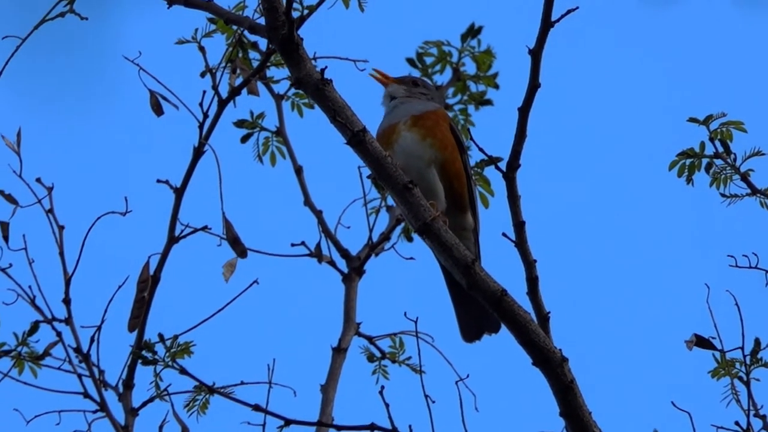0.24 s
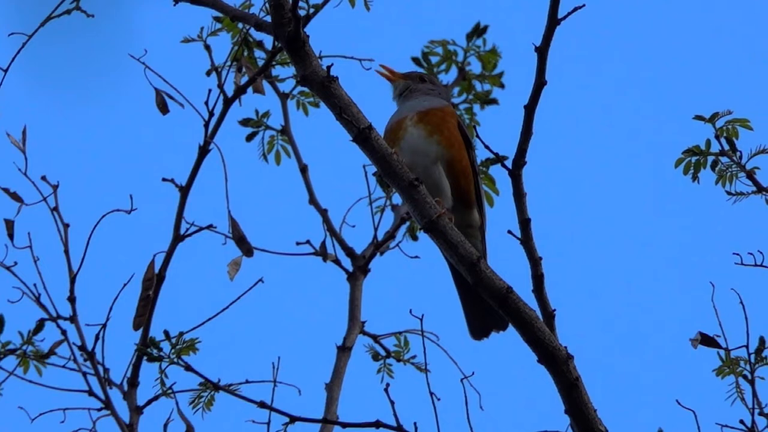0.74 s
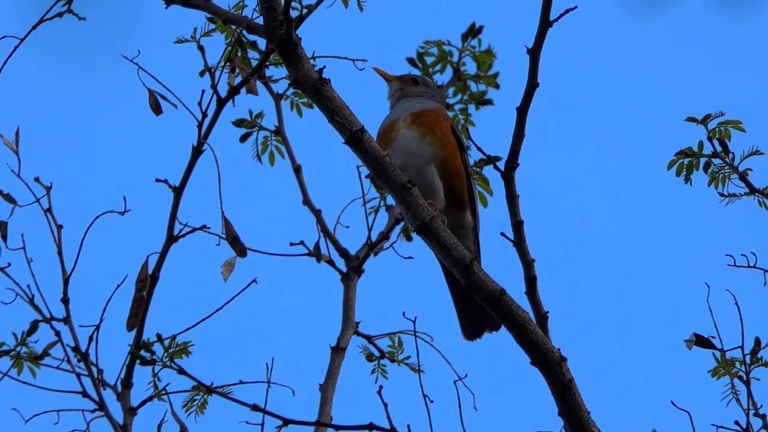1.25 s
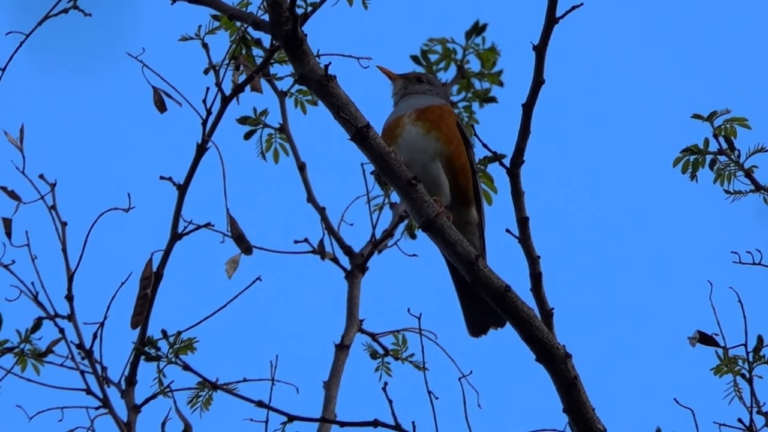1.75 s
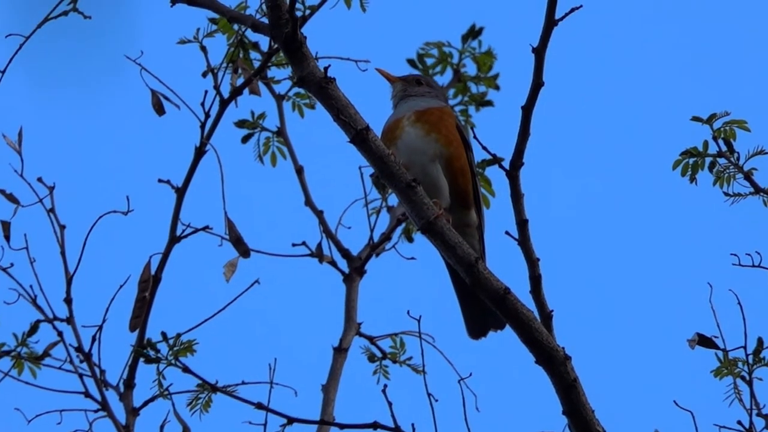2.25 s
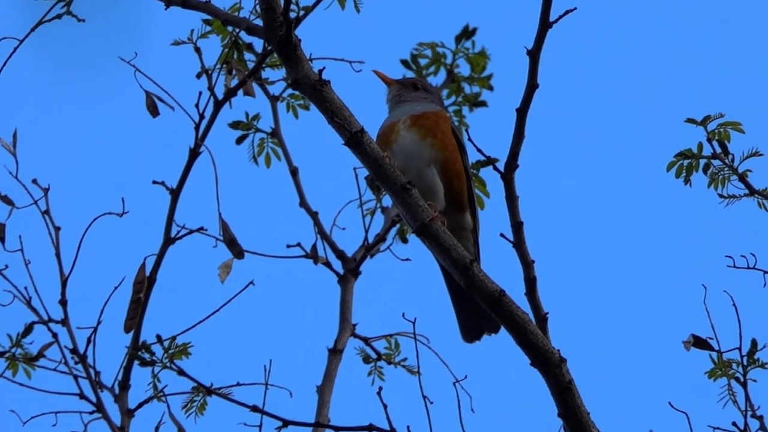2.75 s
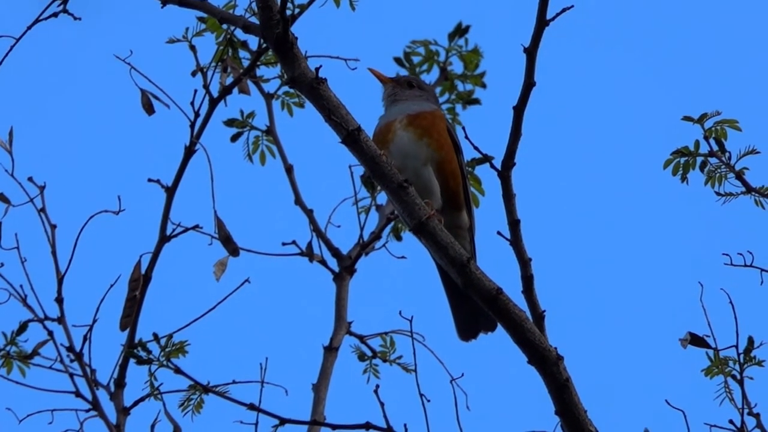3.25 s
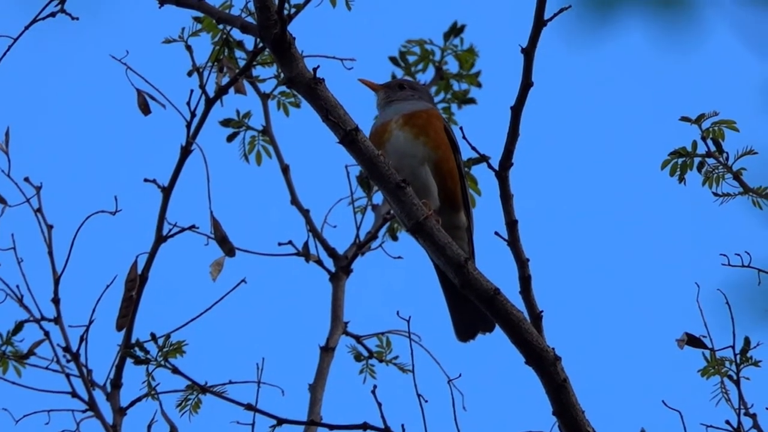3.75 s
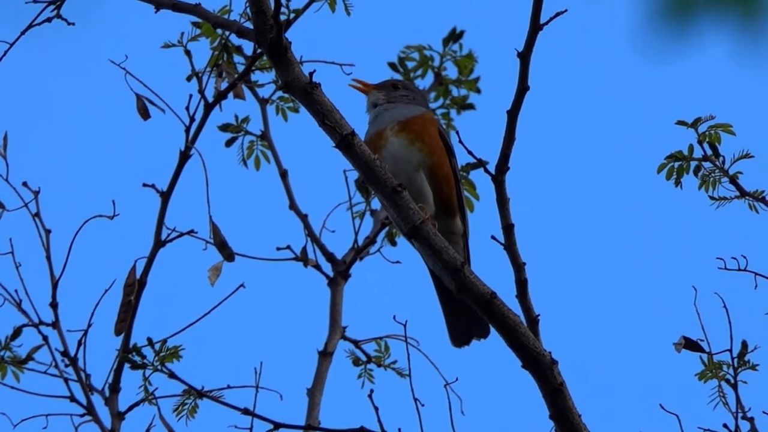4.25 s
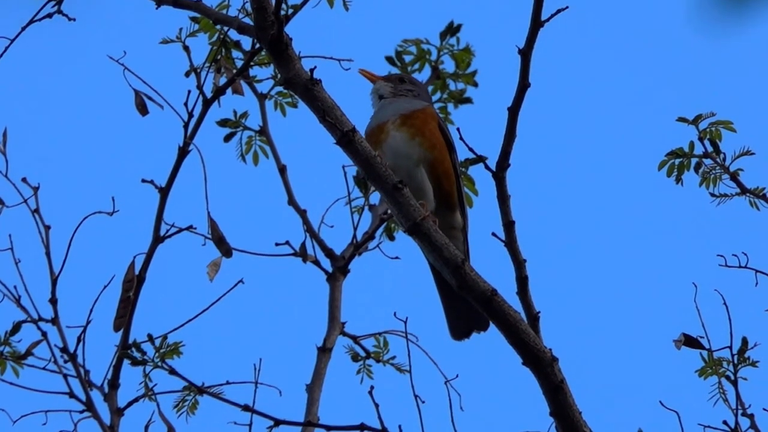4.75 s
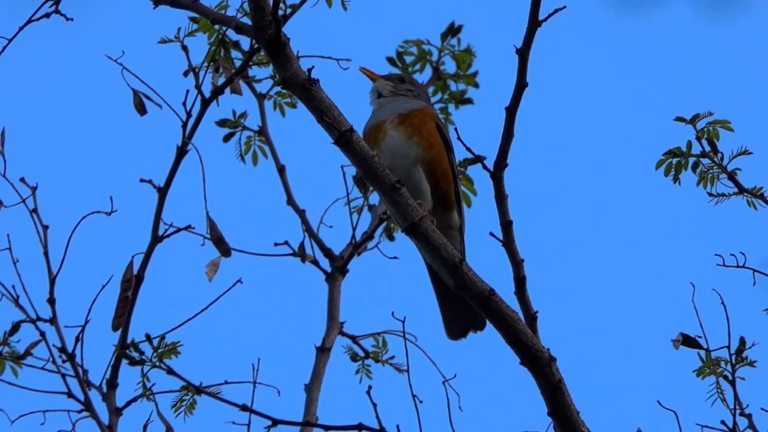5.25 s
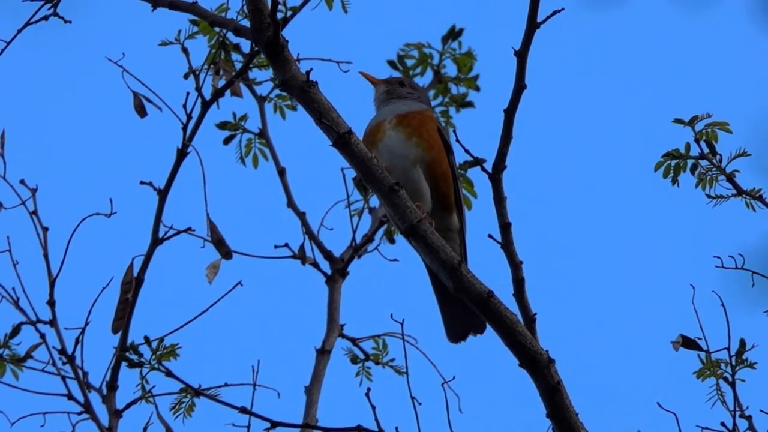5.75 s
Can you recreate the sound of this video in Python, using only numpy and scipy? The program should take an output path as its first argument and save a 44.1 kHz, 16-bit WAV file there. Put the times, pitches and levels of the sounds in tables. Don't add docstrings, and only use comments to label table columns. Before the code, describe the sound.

Clear fluty birdsong in two bursts, at the start and in the last two seconds, stands well above a soft wash of distant traffic. Between them come faint churring, quick high chips, a thin seep and one far crow. The second burst is longer and busier, joined by hoarse caws and sharp small-bird chatter. Leaves hiss in gusts and twigs tick; outdoor stereo pickup, close ground echo and diffuse tree reflections.

```python
import sys
import numpy as np
from scipy import signal
from scipy.io import wavfile
from scipy.ndimage import uniform_filter1d

SR = 44100
rng = np.random.default_rng(int(sys.argv[2]) if len(sys.argv) > 2 else 0)


def generate_wav(signal):
    frames = np.transpose(np.atleast_2d(signal))
    scaled = np.clip(frames, -1, 1) * 32767
    pcm = np.round(scaled).astype(np.int16)
    wavfile.write(sys.argv[1], SR, pcm)


def volts_from_decibels(level):
    exponent = np.asarray(level, float) / 20
    return 10 ** exponent


N = 264159

# (frequency [Hz], level [dB])
OVERTONES = [(3000, -55), (4500, -36.5), (6000, -46.5), (8500, -51.5), (10100, -43.5), (11000, -28.5),
             (13500, -34), (15500, -36)]
# (frequency [Hz], level [dB])
HIGH_OCTAVE = [(7000, -18), (9000, -38), (10800, -27), (12000, -15), (14200, -14), (15500, -27)]


def rms_one(x):
    return x / np.sqrt(np.mean(x ** 2) + 1e-20)


def unit_energy(path):
    return path / np.sqrt(np.sum(path ** 2) / 2)


def butter(x, order, hz, kind="low"):
    return signal.sosfilt(signal.butter(order, hz, kind, fs=SR, output="sos"), x)


def lean(db):
    return volts_from_decibels(db * np.array([[.5], [-.5]]))


def correlated(mid, side, alike):
    return np.sqrt(1 + alike) * mid + np.sqrt(1 - alike) * side * np.array([[1], [-1]])


def at_hz(points, hz):
    return np.interp(np.log(hz), np.log(np.array(points)[:, 0]), np.array(points)[:, 1])


def drift(rate):
    r = np.exp(-80 * np.pi * rate / SR)
    slow = signal.lfilter([1], [1, -2 * r, r * r], rng.standard_normal(N // 40 + 2002))[2000:]
    return np.interp(np.arange(N) / 40, np.arange(len(slow)), rms_one(slow))


def hoarse():
    return rms_one(butter(rng.standard_normal(N), 3, 600))


UNSTEADY = np.tile(drift(30.75), 2)
BREATHY = rms_one(uniform_filter1d(rng.standard_normal(2 * N), size=40))


def add(out, rows, colour=OVERTONES, at=0., db=0., shake=100., turn=0., wobble=0., count=8, first=1,
        patchy_db=4.0, fade=0.0021, round_s=0.0038):
    # (time [s], level [dB])
    beak = [(.1, -2.5), (.45, 3), (.9, -3.5), (4.0, -3.5), (4.2, -2.5), (4.4, -2), (4.8, 1), (5.13, 8.5),
            (5.21, 7), (5.33, 0), (5.65, 4)]
    s, hz, level, *swing = np.transpose(rows)
    t = np.arange(max(s[0] + at, 0) * SR, min((s[-1] + at) * SR, N - 1)) / SR
    hz = np.interp(t - at, s, hz)
    hz = uniform_filter1d(hz, max(int(round_s * SR), 1), mode="nearest")
    if swing:
        cycle = 2 * np.pi * shake * t + turn + wobble * UNSTEADY[:len(t)]
        hz = hz + np.interp(t, s, swing[0]) * np.sin(cycle)
    level = np.interp(t - at, s, level)
    edge = np.clip(np.minimum(t - t[0], t[-1] - t) / fade, 0, 1)
    phase = 2 * np.pi * np.cumsum(hz) / SR
    tone = np.sin(phase) * first
    i = int(t[0] * SR)
    pure = 0.24 * np.maximum(level + 14.0, 0) + hz / 300 * (colour is OVERTONES)
    pure = pure - 6 - np.interp(t, *np.transpose(beak))
    for k in range(2, count + 1):
        unsteady = UNSTEADY[i + 900 * k:][:len(t)]
        gain = volts_from_decibels(at_hz(colour, k * hz) - first * pure + patchy_db * unsteady) * (k * hz < 17000)
        rasp = 1 + first * 0.25 * BREATHY[i + 900 * k:][:len(t)]
        tone += gain * np.sin(k * phase) * rasp
    out[i:i + len(t)] += np.sqrt(2) * volts_from_decibels(level + db) * edge * tone


def thrush():
    return whistles() + low_buzz() + high_buzz() + twitter()


def shaped(shape, note, flick_hz=0):
    s, length, top, end, db = note
    rows = []
    for k, (share, fall, below) in enumerate(shape):
        hz = top - fall * (top - end) + flick_hz * (k == 0)
        rows.append((s + share * length, hz, db + below))
    return rows


def whistles():
    # (share of length [1], share of pitch fall [1], level [dB])
    warble_shape, arch_shape = [(0, .15, -7.5), (.25, 0, -9.5), (.4, 0.12, -1.5), (.65, .35, -2),
                                (1, 1, -16)], [(0, 0.664, -20), (.55, 0.067, -4), (1, 0.89, -7)]
    fall_shape, sag_shape = [(0, -0.31, -12), (.32, 0, -2), (1, 0.53, -3.5)], [(0, 0.096, 0.5), (.25, 0.35, 4), (.6, .55, -3.5), (1, 0.55, -15)]
    # (time [s], length [s], top pitch [Hz], end pitch [Hz], level [dB])
    warbles, arches = [(.008, 0.042, 2117, 1746, -30), (0.051, 0.026, 2121, 1595, -22),
                       (0.083, 0.033, 2040, 1585, -22.5), (0.118, .034, 1953, 1562, -23.5),
                       (0.159, 0.031, 1884, 1590, -21.5)], [(4.145, 0.036, 2274, 1706, -24)]
    falls, sags = [(4.856, 0.044, 2039, 1746, -21.5), (4.906, 0.037, 1860, 1697, -29.5)], [(5.303, 0.07, 1914, 1747, -29)]
    # (time after onset [s], pitch [Hz], level [dB])
    dips = [
        [(0, 2850, -37), (.008, 2780, -28.5), (.022, 2590, -22.5), (.048, 2087, -22), (.063, 1850, -34),
         (.076, 1990, -24), (.096, 2368, -16.5), (.108, 2466, -28.5), (.122, 2490, -35)],
        [(0, 2844, -43), (.009, 2774, -25.5), (.023, 2551, -19), (.047, 2040, -20.5), (.062, 1850, -32.5),
         (.077, 1993, -22), (.097, 2403, -18), (.109, 2458, -21.5), (.123, 2487, -31)],
    ]
    dip_at = [0.315, 0.506]
    # (time after onset [s], pitch [Hz], level [dB])
    dip_hum = [(.118, 2445, -35), (.15, 2450, -36), (.168, 2450, -42)]
    # (time [s], pitch [Hz], level [dB])
    slide = [(4.318, 2850, -47), (4.33, 2840, -27.5), (4.345, 2778, -26.5), (4.357, 2660, -13),
             (4.379, 2526, -20), (4.387, 2550, -14), (4.393, 2273, -26), (4.4, 2026, -26.5),
             (4.409, 2150, -20)]
    # (time [s], pitch [Hz], level [dB])
    lead_ins = [
        [(3.866, 2770, -55), (3.885, 2868, -32.5), (3.904, 2690, -33)],
        [(5.59, 3160, -53), (5.61, 2940, -40)],
    ]
    # (time [s], pitch [Hz], level [dB])
    phrased = [
        [(.196, 1900, -33), (.203, 1990, -29), (.214, 1883, -27), (.235, 1780, -29), (.247, 1700, -37.5),
         (.258, 1750, -48)],
        [(4.409, 2340, -35), (4.428, 2220, -24.5), (4.445, 2113, -26), (4.456, 2016, -29.5),
         (4.474, 1780, -36.5)],
        [(4.672, 2160, -36), (4.688, 2146, -26.5), (4.698, 2214, -21.5), (4.707, 2240, -27),
         (4.714, 2090, -22.5), (4.727, 2038, -19), (4.735, 1970, -47)],
        [(4.737, 2663, -31.5), (4.746, 2227, -27.5), (4.755, 2228, -16), (4.768, 2308, -23), (4.776, 2210, -22),
         (4.782, 2168, -14.5), (4.791, 2044, -21.5), (4.799, 1830, -24)],
        [(4.804, 2224, -39), (4.811, 2220, -29), (4.821, 2134, -18), (4.835, 1910, -26), (4.849, 1800, -22.5)],
        [(5.107, 2102, -35.5), (5.125, 2113, -25.5), (5.145, 2120, -23), (5.161, 2140, -23.5),
         (5.168, 1980, -36), (5.175, 2070, -32)],
        [(5.175, 2090, -29), (5.19, 2180, -21.5), (5.203, 2209, -24.5), (5.219, 2198, -21.5),
         (5.226, 2173, -16.5), (5.234, 1998, -28), (5.24, 1980, -31.5)],
        [(5.174, 3100, -34), (5.178, 2580, -32), (5.182, 2200, -16)],
        [(4.189, 1790, -28), (4.195, 2010, -40), (4.199, 2675, -32), (4.204, 1975, -26.5), (4.212, 1840, -35),
         (4.225, 1675, -36), (4.233, 1715, -46)],
        [(5.245, 2745, -33), (5.249, 2390, -26.5), (5.256, 2057, -25.5), (5.27, 2026, -20.5),
         (5.283, 1923, -23), (5.291, 2090, -24)],
    ]
    out = np.zeros(N)
    for shape, notes in [(warble_shape, warbles), (arch_shape, arches), (fall_shape, falls)]:
        for note in notes:
            add(out, shaped(shape, note))
    for note in sags:
        add(out, shaped(sag_shape, note, flick_hz=561))
    for s, rows in zip(dip_at, dips):
        add(out, rows, at=s, round_s=0.0036)
        add(out, dip_hum, at=s, count=1)
    for rows in [slide] + lead_ins + phrased:
        add(out, rows, round_s=0.0022, fade=0.0017)
    return out


def low_buzz():
    # (time [s], pitch [Hz], level [dB], swing [Hz])
    low_notes = [(3.904, 2692, -25.5, 230), (3.942, 2715, -24.5, 414), (3.975, 2619, -21.5, 384),
                 (4.03, 2575, -20.5, 363), (4.061, 2590, -25.5, 347)]
    # (frequency [Hz], width [Hz])
    hz, width = (2740, 450)
    buzz = np.zeros(N)
    raised = [(f, db + 3.0) for f, db in OVERTONES]
    add(buzz, low_notes, colour=raised, shake=62.5, turn=1.63, wobble=0.72, db=1.5)
    return 0.39 * buzz + 0.44 * signal.lfilter(*signal.iirpeak(hz, hz / width, fs=SR), buzz)


def high_buzz():
    # (time [s], pitch [Hz], level [dB], swing [Hz])
    high_notes = [(.803, 3540, -51, 5), (0.815, 4350, -40, 3), (0.822, 6850, -41.5, 410),
                  (0.872, 6770, -35.5, 290), (0.913, 6710, -36, 330), (.92, 6200, -32.5, 10),
                  (0.927, 4840, -33.5, 5), (0.934, 4240, -33.5, 11), (0.944, 3200, -42, 8)]
    second_voice = [(.832, 3225, -51, 80), (.86, 3250, -46, 60), (.89, 3250, -55, 60),
                    (.912, 3270, -48, 60), (.928, 3050, -50, 40)]
    sum_tone = [(.83, 10010, -57, 250), (.87, 9900, -54, 260), (.918, 10100, -54, 200)]
    shake = 141.
    out = np.zeros(N)
    add(out, high_notes, colour=HIGH_OCTAVE, shake=shake, turn=.3, wobble=0.99, round_s=0.0025, count=2)
    add(out, second_voice, shake=shake, wobble=0.87)
    add(out, sum_tone, shake=shake, count=1)
    return out


def twitter():
    # (time [s], level [dB])
    hooks_at = [(5.603, -5), (5.638, -2.8), (5.671, -7), (5.706, -10.5)]
    # (time after onset [s], pitch [Hz], level [dB])
    hook_up, hook_down = [(.005, 4860, -44), (.0095, 5270, -36), (.012, 6800, -36), (.015, 7250, -34),
                          (.023, 7250, -35), (.027, 7150, -46)], [(.013, 5460, -44), (.016, 5020, -51), (0.02, 3637, -46),
                                           (.029, 2800, -37.5), (.04, 2340, -43)]
    # (time [s], pitch [Hz], level [dB])
    pickup = [(5.599, 5070, -52), (5.603, 5070, -36), (5.606, 4900, -35), (5.61, 3500, -39)]
    # (time [s], centre [Hz], level [dB], swing [Hz])
    breath = [(5.599, 4810, -60, 900), (5.617, 5300, -45, 1710), (5.69, 5390, -50, 1820),
              (5.755, 6030, -49, 1500)]
    clean, rough = np.zeros((2, N))
    add(clean, pickup, colour=HIGH_OCTAVE, round_s=0.0026, fade=0.0031, count=3)
    for s, db in hooks_at:
        add(clean, hook_up, colour=HIGH_OCTAVE, at=s, db=db, round_s=0.0017, count=2, fade=0.0022)
        add(rough, hook_down, at=s, db=db)
    add(rough, breath, colour=HIGH_OCTAVE, shake=230.0, wobble=6.8, count=2)
    return clean + rough * (1 + 0.51 * hoarse())


def crows():
    # (time [s], length [s], top pitch [Hz], loudest at share of length [1], level [dB])
    caws = [
        (3.08, 0.18, 479.5, 0.48, -51.5),
        (4.675, 0.21, 434.3, 0.7, -39.5),
        (5.243, .215, 433.8, 0.7, -39.5),
        (5.83, 0.2, 428, 0.69, -43.5),
    ]
    caw_arch = [
        (.49, .56, 1.15),
        (.46, .63, 1.6),
    ]
    # (frequency [Hz], level [dB])
    first_throat, second_throat = [(400, -29), (950, -7), (1100, -20), (1250, 12), (1450, 7), (1700, 10),
                                   (1830, 0), (1900, -8), (1990, 12.5), (2150, -43), (4600, -11),
                                   (6000, -20)], [(400, -36), (900, -25), (1150, -14), (1280, -1),
                                                        (1400, -1.5), (1550, 3), (1720, -9.5), (1900, -28),
                                                        (3200, -22), (4000, -59)]
    out, share = np.zeros(N), np.linspace(0, 1, num=21)
    for k, (s, length, top, loudest, db) in enumerate(caws):
        crest, droop, roundness = caw_arch[k > 0]
        hz = top * (1 - droop * np.abs(share - crest) ** roundness)
        swell = db - 27 * (share - loudest) ** 2
        caw = np.transpose([s + share * length, hz, swell])
        add(out, caw, colour=[first_throat, second_throat][k > 0], count=12, first=0, patchy_db=1.0,
            fade=0.0012, round_s=0.039)
    return out * volts_from_decibels(0.5 * drift(5.6))


def small_birds():
    # (time [s], pitch [Hz], level [dB], swing [Hz])
    chatter = [
        [(1.483, 8240, -51, 450), (1.51, 8170, -44.5, 497), (1.562, 8170, -49.5, 500)],
        [(5.63, 8000, -55.5, 795), (5.7, 8140, -41, 910), (5.76, 8180, -53, 786)],
    ]
    # (time after onset [s], pitch [Hz], level [dB])
    chip = [(0, 8200, -6), (.003, 6600, -.1), (.006, 5200, -2), (.009, 4000, -10)]
    # (time [s], level [dB])
    chip_at = [(1.49, -53.5), (1.515, -50), (1.538, -48), (1.549, -53), (1.581, -46.5), (1.617, -48.5),
               (1.662, -47), (1.703, -48.5), (5.625, -39), (5.642, -36.5), (5.662, -48), (5.683, -35.5),
               (5.703, -57), (5.722, -74), (5.745, -46), (5.777, -44), (5.812, -47), (5.85, -47)]
    # (lag [s], level [dB])
    flurry = [(0, -2), (.0025, -3), (.0055, -5), (.008, -7), (.012, -12)]
    # (time [s], pitch [Hz], level [dB])
    chatter_arcs = [
        [(5.688, 8240, -44), (5.694, 9400, -39), (5.699, 8200, -42), (5.706, 7600, -41)],
        [(5.715, 8500, -50), (5.721, 9350, -45), (5.727, 7600, -42)],
        [(5.129, 8500, -56), (5.135, 8850, -44), (5.14, 8700, -58)],
        [(5.589, 6220, -60), (5.595, 5900, -58), (5.602, 6100, -55)],
    ]
    # (time after onset [s], pitch [Hz], level [dB])
    seep = [(0, 6720, -54), (.008, 7640, -36.5), (0.022, 7300, -42), (.028, 6610, -42), (.045, 6950, -45),
            (.06, 6610, -43)]
    # (time [s], level [dB])
    seep_at = [
        (3.047, -1),
        (4.597, -6.5),
    ]
    # (time [s], pitch [Hz], level [dB])
    thin_arcs = [
        [(1.005, 11300, -68), (1.035, 12300, -62), (1.07, 12500, -60), (1.105, 11500, -67)],
        [(1.145, 12500, -64), (1.172, 11600, -67)],
    ]
    out = np.zeros(N)
    for rows in chatter:
        add(out, rows, shake=80.0, turn=1.3, wobble=.9, count=1)
    for s, db in chip_at:
        for lag, lag_db in flurry:
            add(out, chip, at=s + lag, db=db + lag_db, count=1, fade=0.0012, round_s=.001)
    out = out * (.75 + .75 * hoarse())
    for rows in chatter_arcs:
        add(out, rows, count=1, round_s=0.0034, fade=0.0013)
    for s, db in seep_at:
        add(out, seep, at=s, db=db, count=1, round_s=0.0051)
    for rows in thin_arcs:
        add(out, rows, count=1, round_s=0.027)
    return out


def far_birds():
    # (time [s], level [dB])
    churr_at = [(.32, -57), (0.399, -49), (.49, -50), (.595, -49.5), (0.691, -48), (0.781, -51),
                (.96, -47.5), (1.04, -52), (2.12, -52.5), (2.2, -48.5), (2.295, -51.5), (2.395, -49.5),
                (2.5, -46.5), (2.611, -50.5)]
    # (start pitch [Hz], end pitch [Hz], level [dB], swing [Hz])
    churr = [
        (4630, 4350, 1.5, 265),
        (3715, 3520, -1, 130),
    ]
    # (time [s], pitch [Hz], level [dB])
    faint_whistles = [
        [(1.045, 3240, -54), (1.09, 3110, -57.5), (1.135, 2950, -59)],
        [(1.16, 2620, -53.5), (1.21, 2520, -60), (1.245, 2450, -70)],
        [(2.645, 4650, -64), (2.68, 4600, -66), (2.73, 4600, -66)],
    ]
    out = np.zeros(N)
    for s, db in churr_at:
        for start, end, voice_db, swing in churr:
            rows = [(s - .01, start, db - 5.0, swing),
                    (s + 0.0229, (start + end) / 2, db - 5.5, swing),
                    (s + 0.068, end, db - 17.0, swing)]
            add(out, rows, db=voice_db, shake=62.0, turn=40 * s, wobble=2.7, count=1, fade=0.023)
    for rows in faint_whistles:
        add(out, rows, count=1, fade=0.006)
    return out * (1 + .4 * hoarse())


def far_motor():
    # (time [s], pitch [Hz], level [dB], swing [Hz])
    motor = [(0, 528.6, -58, 30), (.12, 522, -68, 30), (.3, 521, -64, 30), (.6, 541, -74.5, 30)]
    out = np.zeros(N)
    add(out, motor, shake=10.0, wobble=3.03, count=1, fade=0.012)
    return out


def far_sounds():
    return (far_birds() + far_motor()) * volts_from_decibels(2.5 * drift(40))


def outdoors(x, ground, wet_db, t60, alike):
    # (lag [s], level [dB], lean to left, and opposite to right [dB])
    late_echoes = [(.0057, -18, 2), (.0127, -22, 3), (.052, -21, 2), (.075, -20, -2)]
    # (lag [s], spread [s], level [dB])
    wood_s, wood_spread, wood_db = (0.27, 0.4, -23)
    t = np.arange(int(1.6 * SR)) / SR
    mid, side = rng.standard_normal((2, len(t))) * volts_from_decibels(-60 * t / t60) * np.clip(t / .015, 0, 1)
    path = volts_from_decibels(wet_db) * unit_energy(butter(correlated(mid, side, alike), 1, 7000))
    walls = np.zeros_like(path)
    for s, db, lean_db in late_echoes:
        walls[:, round(s * SR)] += volts_from_decibels(db + lean_db * np.array([1, -1]))
    path += butter(walls, 2, 4200)
    wood = rng.standard_normal(path.shape) * np.exp(-((t - wood_s) / wood_spread) ** 2)
    path += volts_from_decibels(wood_db) * unit_energy(wood)
    path = signal.lfilter([.55], [1, -.45], path)
    twigs = rng.standard_normal(path.shape) * volts_from_decibels(-60 * t / 0.21)
    path += butter(volts_from_decibels(-0.5) * unit_energy(twigs), 2, 7900, "high")
    path[:, 0] += 1
    bounce = np.zeros_like(path)
    echo_s, right_lag_s = .00744, .000025
    bounce[0, round(echo_s * SR)] = ground * volts_from_decibels(2.5)
    bounce[1, round((echo_s + right_lag_s) * SR)] = ground * volts_from_decibels(-2.5)
    path += butter(bounce, 1, 5000)
    return signal.fftconvolve(x[None], path, axes=1)[:, :N]


def background():
    return traffic() + leaves() + twig_ticks() + drone()


def banded_noise(spectrum, source, patchy_db):
    # (frequency [Hz], correlation [1])
    likeness = [(30, .88), (150, .92), (330, .92), (700, 0.6), (2000, 0.54), (6000, 0.49), (15000, 0.3)]
    # (frequency [Hz], level [dB])
    band_lean = [(60, -.5), (330, -1.5), (600, 3.3), (1200, 1.5), (2500, .6), (8000, 1.8), (15000, .8)]
    out, edges = 0, 20 * 2 ** np.arange(0, 9.8, .4)
    for k, (low, high) in enumerate(zip(edges, edges[1:])):
        hz = np.sqrt(low * high)
        if hz < spectrum[0][0]:
            continue
        mid, side = butter(source[k % 2], 2, [low, high], "band")
        alike = np.clip(at_hz(likeness, hz), -1, 1)
        gain = volts_from_decibels(at_hz(spectrum, hz) + patchy_db * drift(1.86))
        out = out + gain * lean(at_hz(band_lean, hz)) * correlated(mid, side, alike)
    return rms_one(out)


def gusts():
    # (time of height [s], level [dB], rise [dB/s], fall [dB/s])
    gust_rows = [
        (.35, -75, 70, 13),
        (1.0, -71, 34, 38),
        (2.029, -57.5, 66, 62),
        (2.78, -57.5, 19.5, 19.5),
        (5.03, -53, 41.5, 46),
        (5.738, -66, 58, 38),
    ]
    t = np.arange(N) / SR
    slopes = [db - np.maximum(rise * (s - t), fall * (t - s)) for s, db, rise, fall in gust_rows]
    return volts_from_decibels(-83.5) + volts_from_decibels(np.max(slopes, axis=0))


def leaves():
    # (frequency [Hz], density [dB per Hz])
    leaf_spectrum = [(880, -58), (1500, 0), (2080, -4), (2290, 5.5), (2960, -11.5), (3640, -1), (5670, -6),
                     (13200, -6.5), (15800, 1)]
    grainy = rng.standard_normal((2, 2, N)) * volts_from_decibels(1.27 * drift(60))
    return gusts() * volts_from_decibels(13.5) * banded_noise(leaf_spectrum, grainy, patchy_db=0.94)


def twig_ticks():
    # (time [s], peak level [dB])
    tick_rows = [(1.78, -42), (2.444, -46), (2.757, -44), (3.383, -35), (4.96, -38), (5.04, -40),
                 (5.108, -23), (5.11, -40), (5.301, -31), (5.41, -48)]
    ticks = np.full(N, 1e-18)
    for at, db in tick_rows:
        ticks[round(at * SR):][:40] += volts_from_decibels(db) * rng.standard_normal(40) * np.exp(-np.arange(40) / 12)
    return butter(ticks, 2, 3000, "high")


def traffic():
    # (frequency [Hz], density [dB per Hz])
    road_spectrum = [(12, -71), (20, -40), (181, -28.5), (214, -26), (326, -24.5), (419, -18.5),
                     (569, -7.5), (915, 0), (1080, -4.5), (1350, -3.5), (2110, -12), (2960, -9),
                     (5460, -37.5), (13300, -40), (15800, -21)]
    # (time [s], level [dB])
    road_course = [(0, -52.5), (1.1, -54.5), (2.75, -51.5), (4.4, -55), (4.949, -50), (5.401, -54),
                   (5.99, -52)]
    level = np.interp(np.arange(N) / SR, *np.transpose(road_course))
    white = rng.standard_normal((2, 2, N))
    return volts_from_decibels(level + 4.0) * banded_noise(road_spectrum, white, patchy_db=1.3)


def drone():
    hz, width_hz = 917.4, 32
    band = signal.iirpeak(hz, hz / width_hz, fs=SR)
    once = signal.lfilter(*band, rng.standard_normal(N))
    return volts_from_decibels(-63.5) * lean(5) * rms_one(signal.lfilter(*band, once))


def scene():
    # (time [s], left-right level [dB])
    head_turn = [(.3, 1.4), (.7, 0), (3.899, -1.2), (4.4, 0), (4.8, -0.2), (5.2, 1.4), (5.7, 0)]
    turned = np.interp(np.arange(N) / SR, *np.transpose(head_turn))
    singer = outdoors(thrush(), ground=.72, wet_db=-13, t60=0.43, alike=0.46) * lean(turned)
    caws = outdoors(crows(), ground=0.32, wet_db=-8, t60=0.31, alike=0.16) * lean(1.6)
    near = outdoors(small_birds(), ground=0.72, wet_db=-1.5, t60=0.34, alike=0.06) * lean(-.2)
    far = outdoors(far_sounds(), ground=1.0, wet_db=0.5, t60=1.0, alike=0.38) * lean(1.2)
    return singer + caws + near + far + background()


def roll_off(x):
    return signal.sosfilt(signal.butter(12, 15850, fs=SR, output="sos"), x)


def record(dry):
    dry = dry + .006 * dry ** 2
    dry = signal.sosfilt(signal.cheby2(12, 60, 16300, fs=SR, output="sos"), dry)
    return roll_off(dry)


dry = scene()
out = record(dry)
generate_wav(out)
```